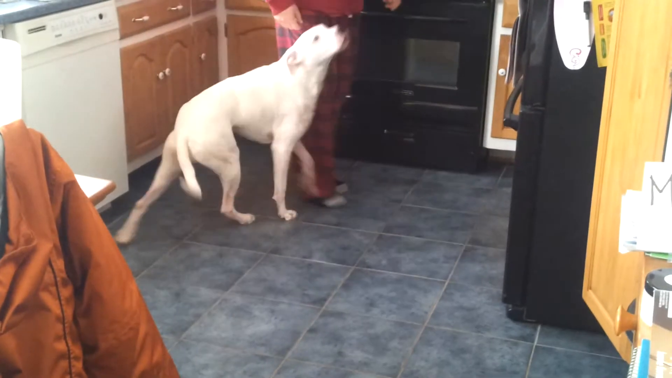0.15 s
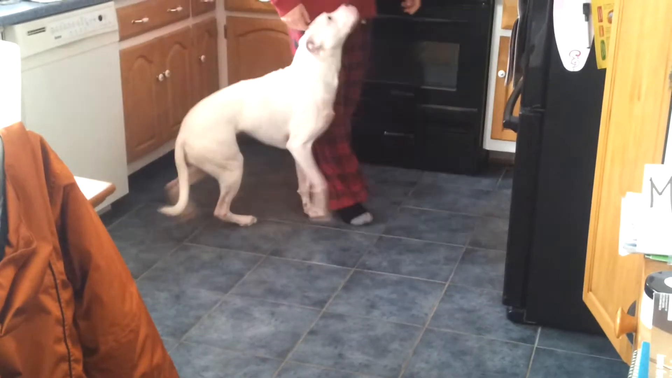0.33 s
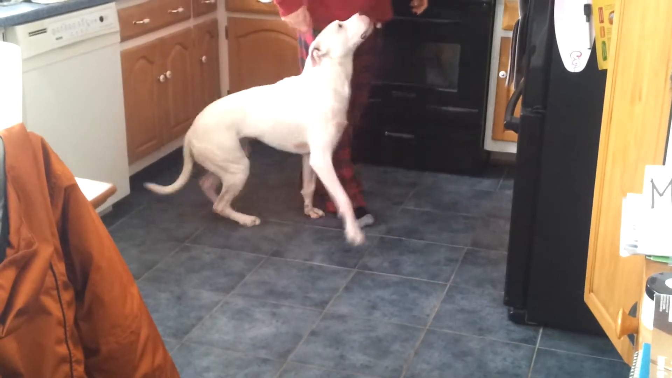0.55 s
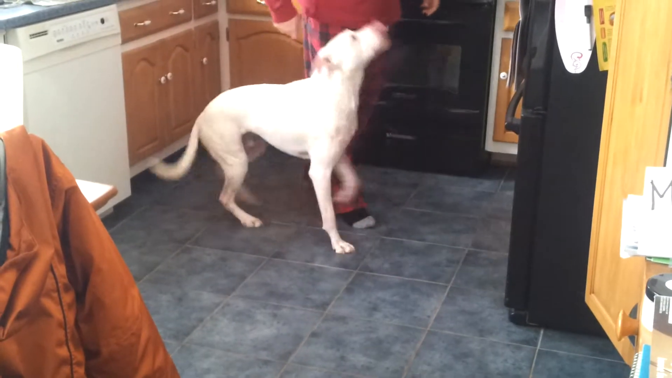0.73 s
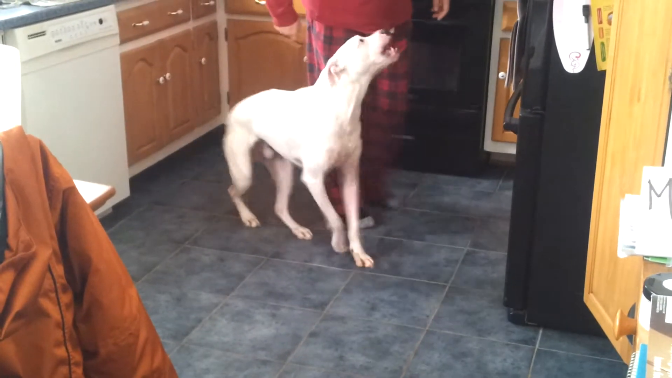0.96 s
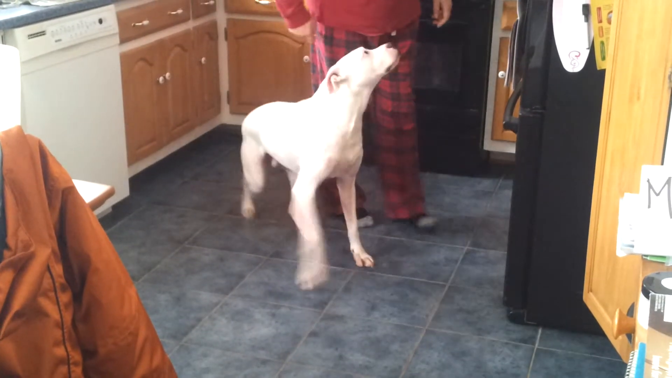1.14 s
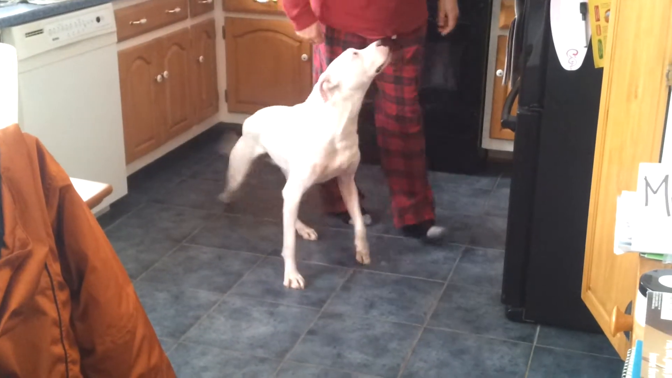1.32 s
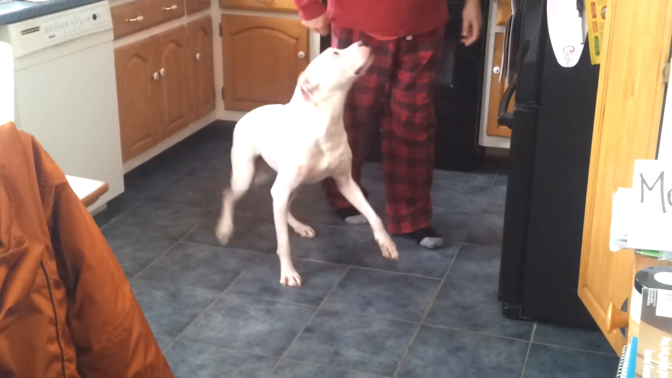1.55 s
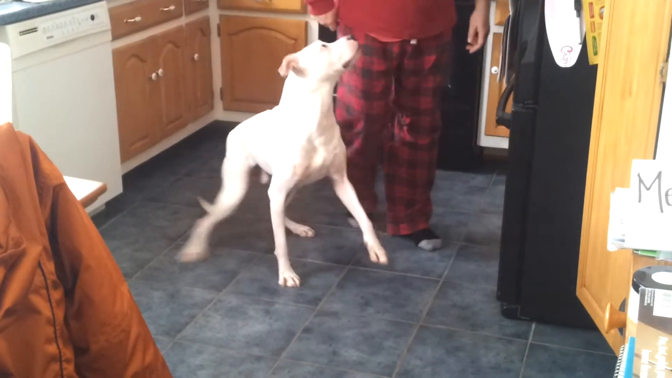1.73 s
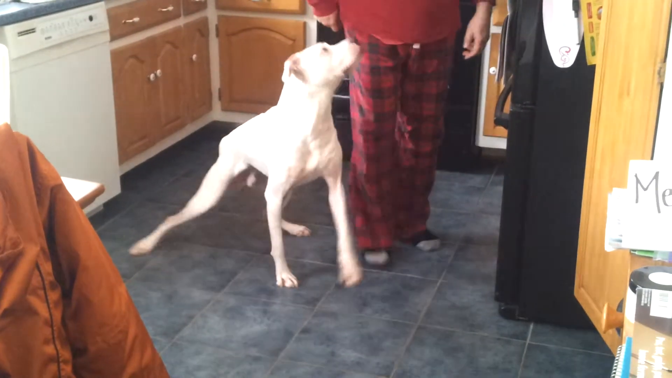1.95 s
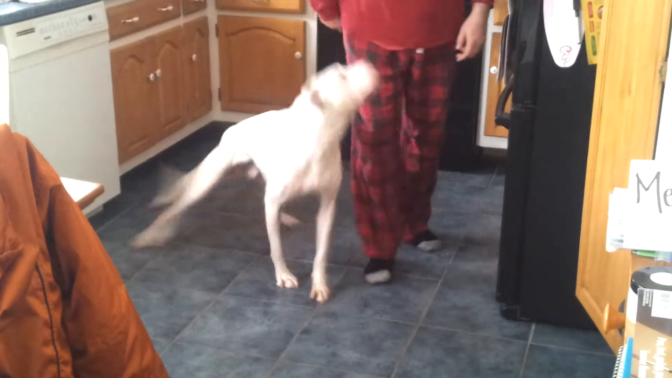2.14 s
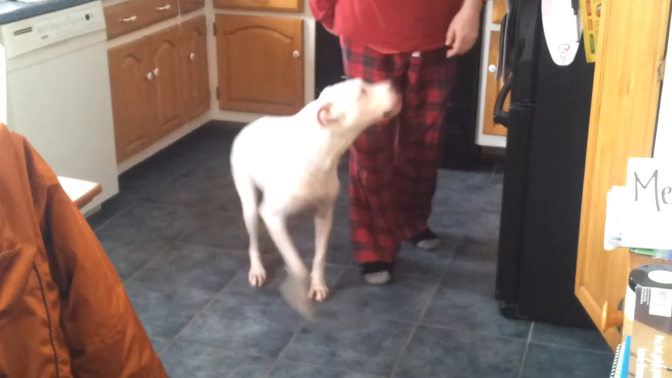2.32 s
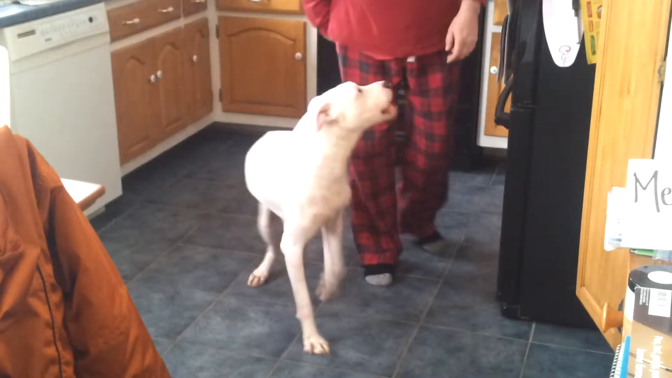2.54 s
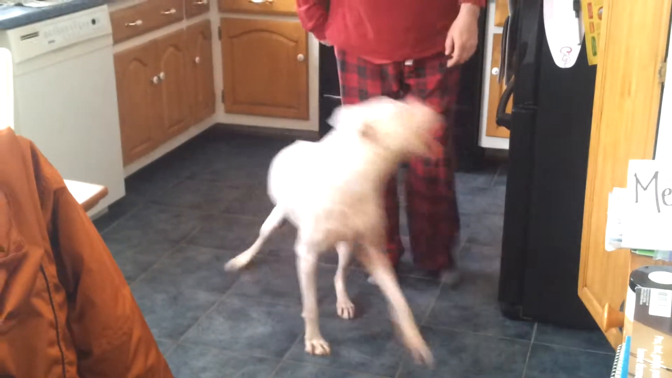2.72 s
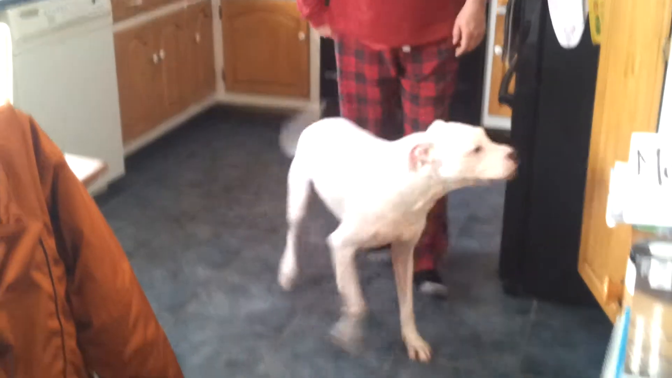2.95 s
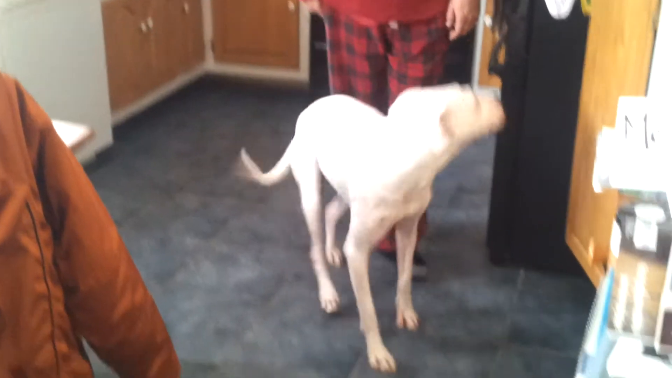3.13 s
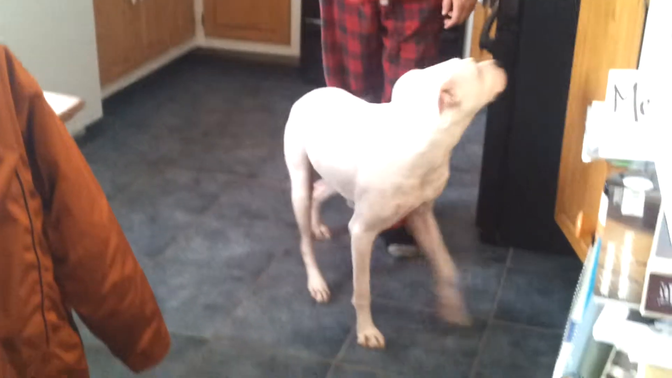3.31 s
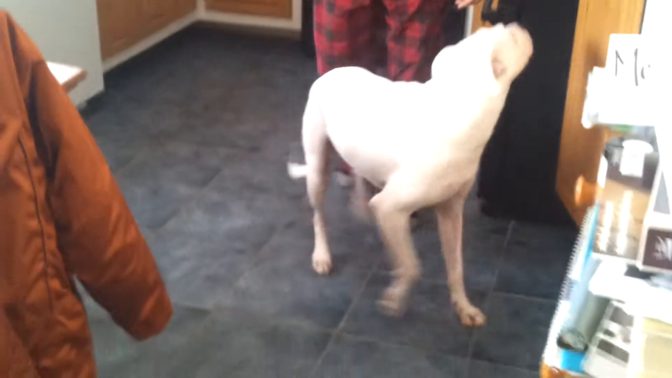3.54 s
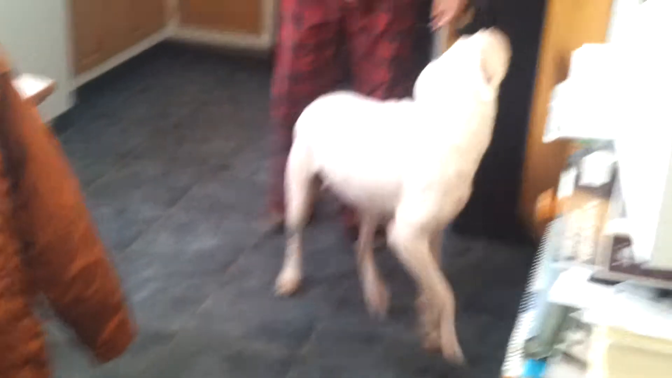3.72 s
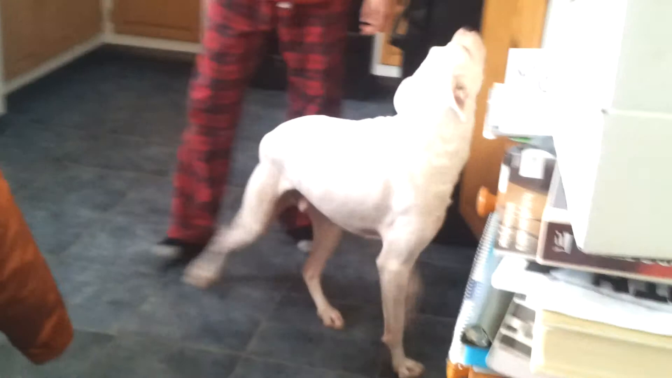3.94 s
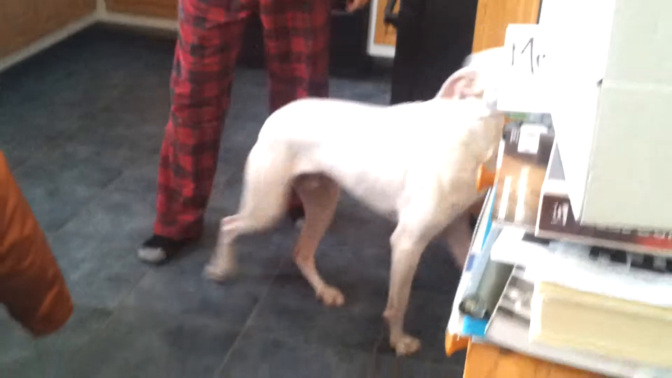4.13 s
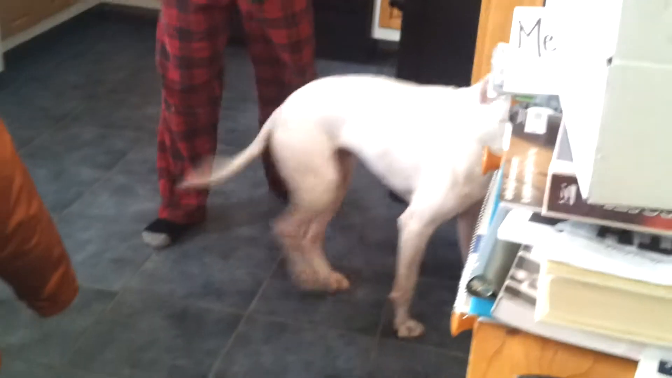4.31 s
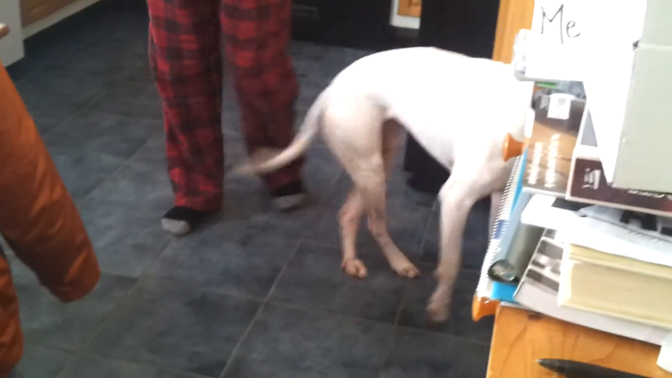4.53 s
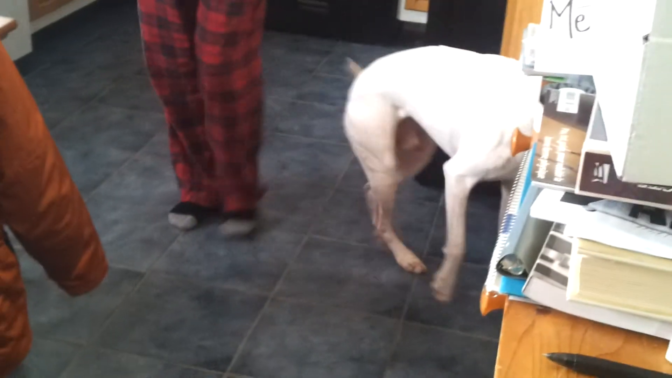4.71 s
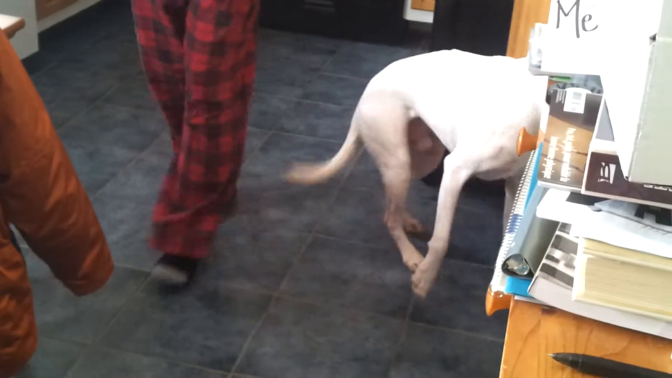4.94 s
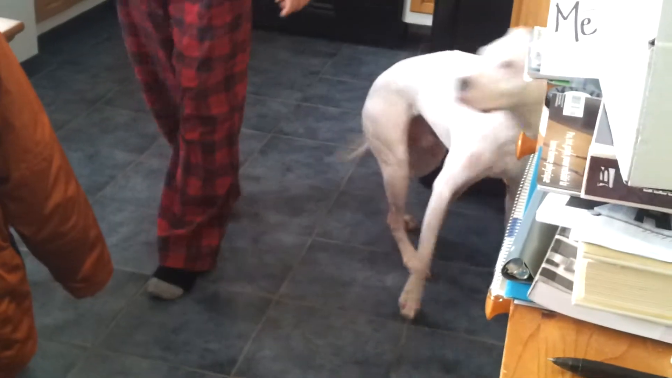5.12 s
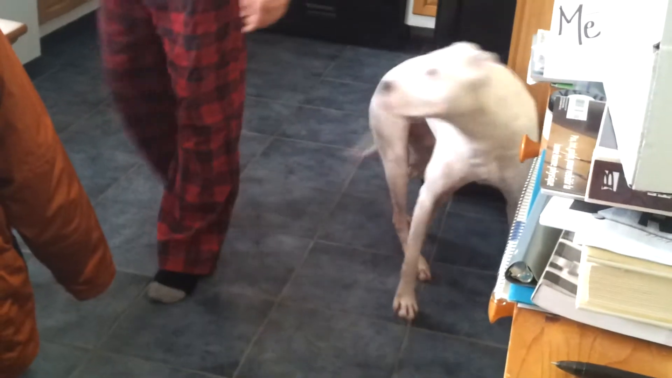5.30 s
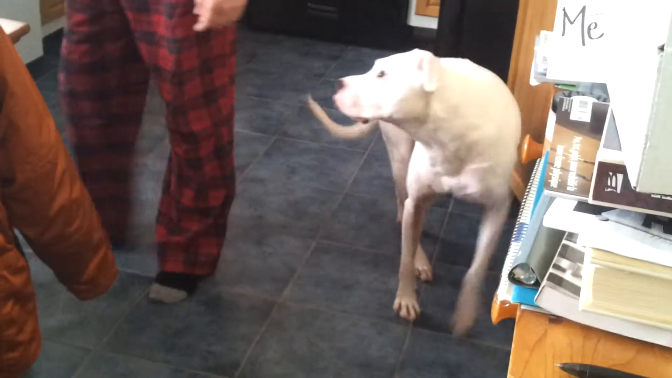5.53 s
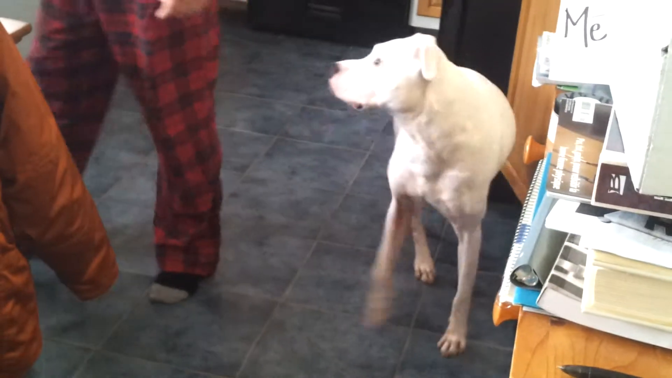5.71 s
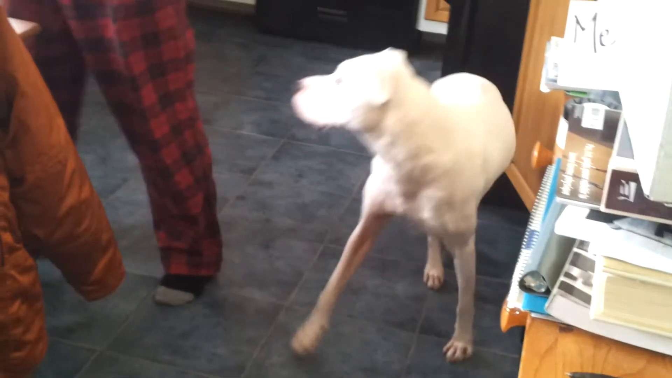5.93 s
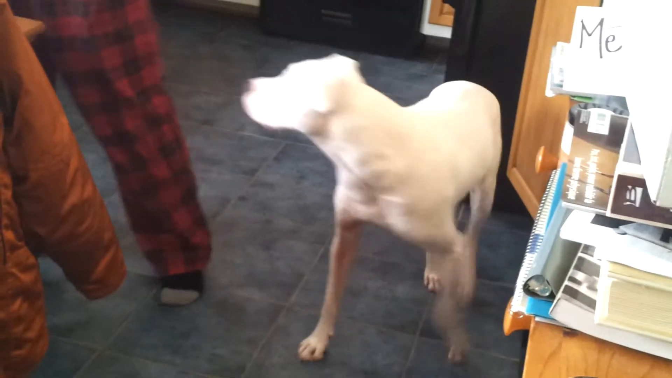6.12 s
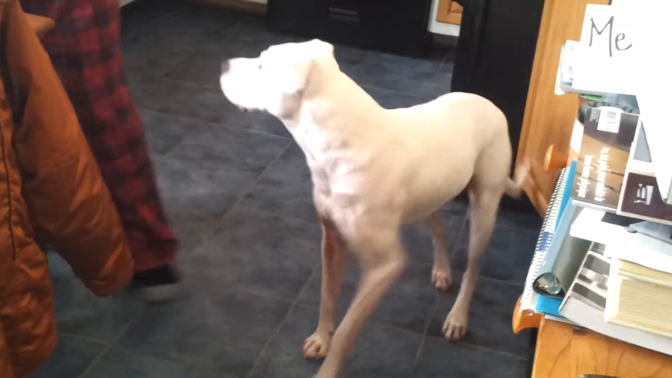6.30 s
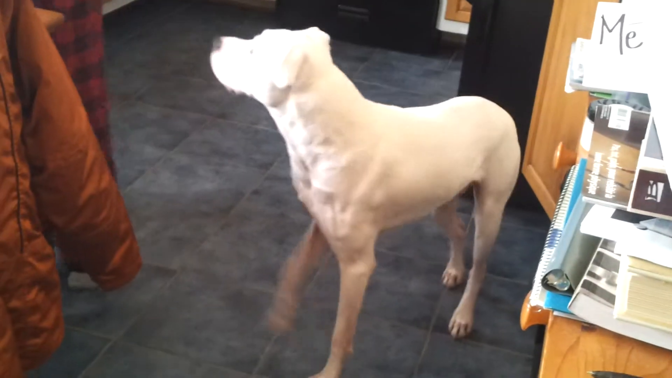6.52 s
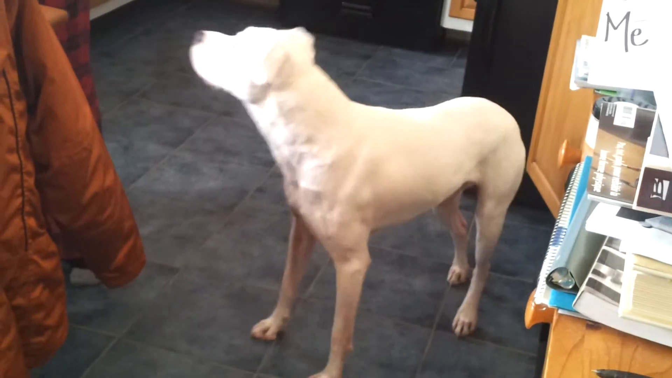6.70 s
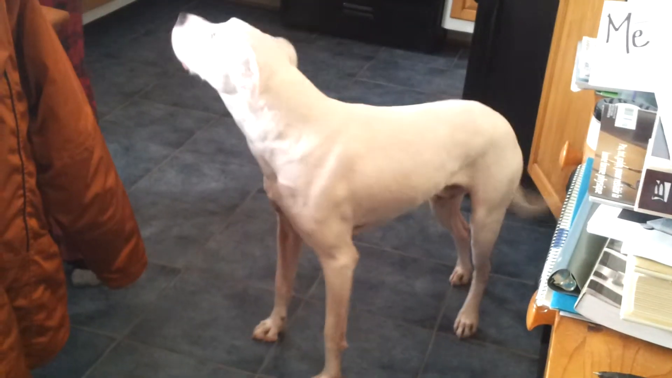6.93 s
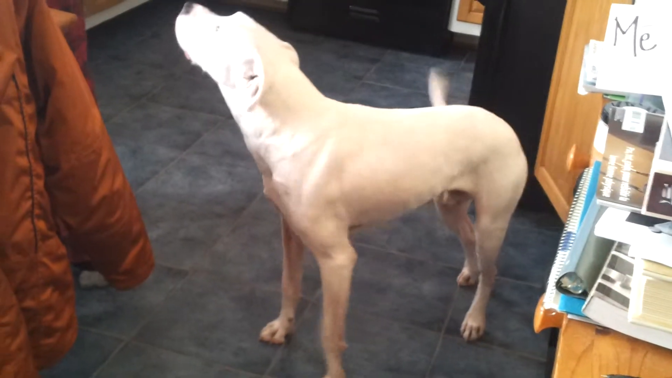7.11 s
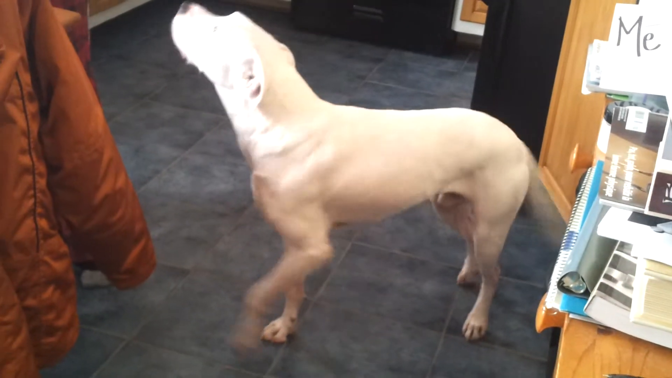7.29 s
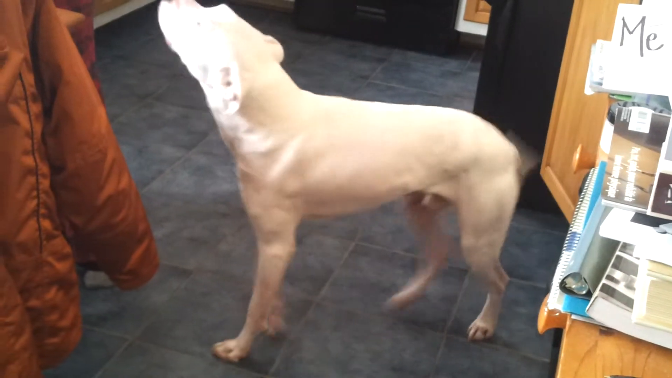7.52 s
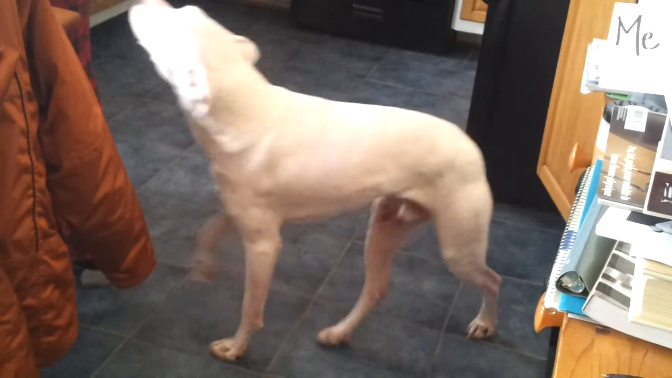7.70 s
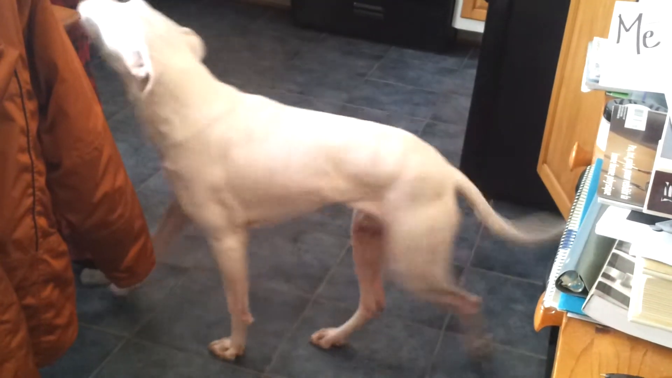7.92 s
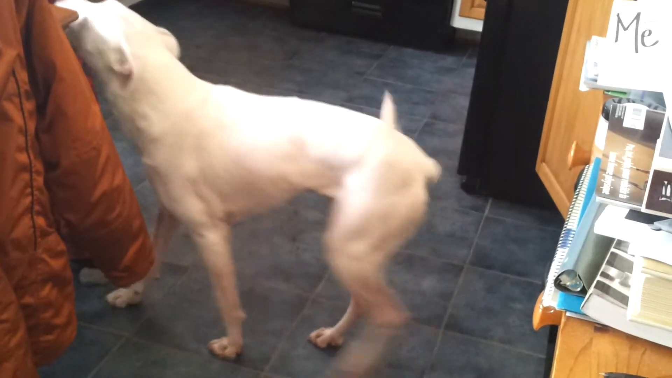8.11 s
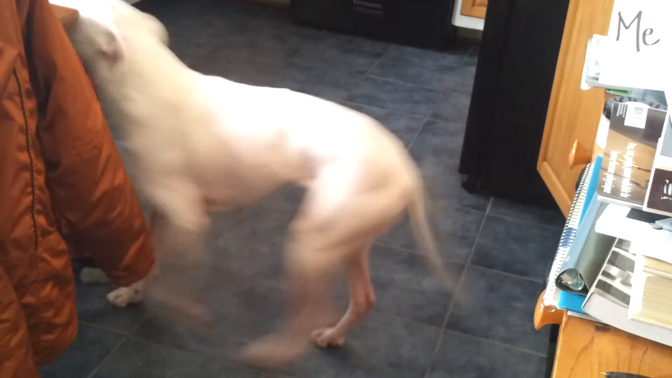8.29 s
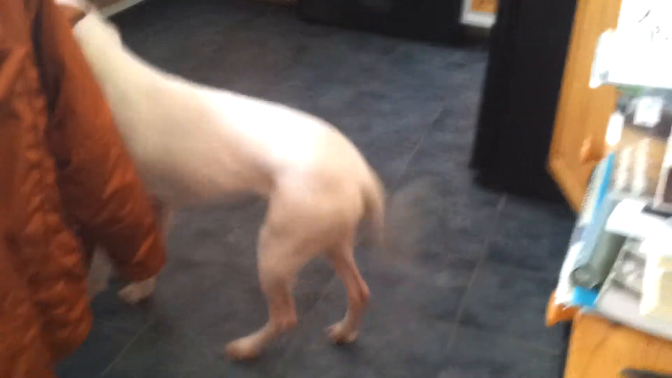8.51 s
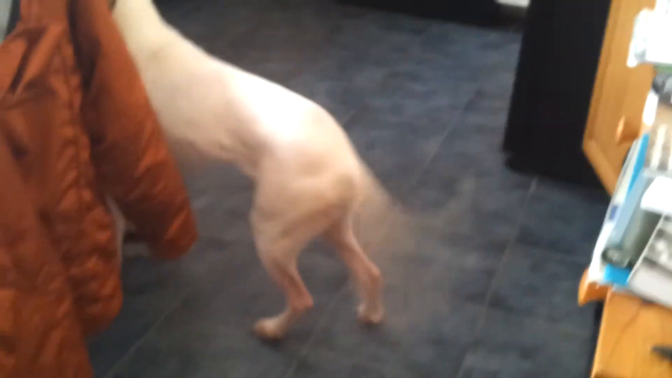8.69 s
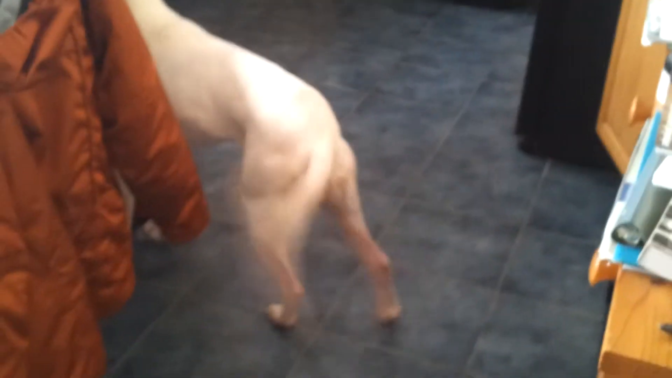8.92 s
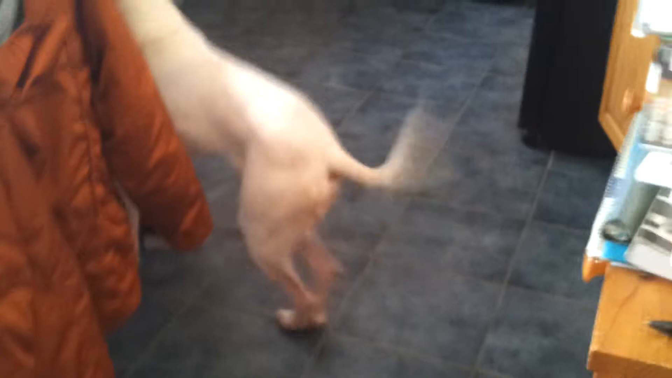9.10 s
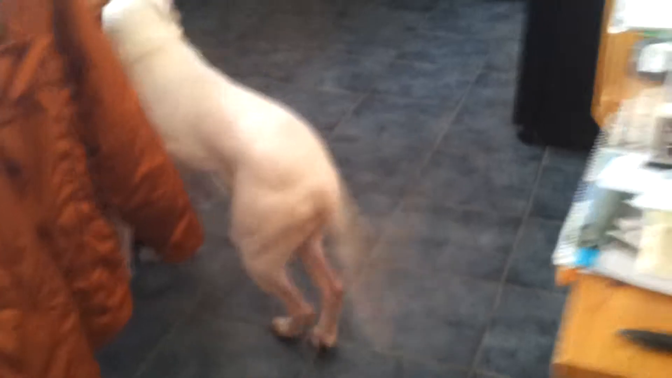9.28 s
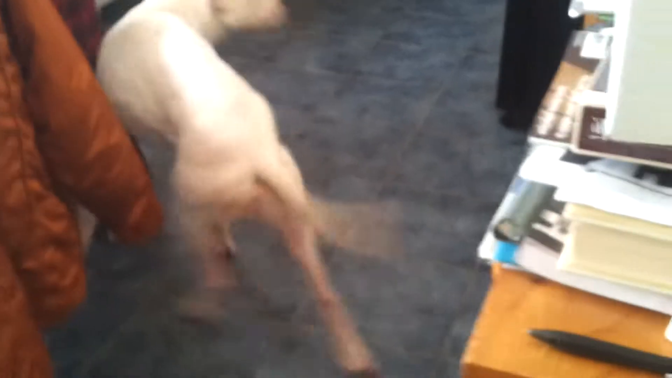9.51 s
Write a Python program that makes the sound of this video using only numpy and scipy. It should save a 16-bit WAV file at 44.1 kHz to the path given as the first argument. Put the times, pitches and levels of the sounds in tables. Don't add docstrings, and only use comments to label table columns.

```python
import sys
import numpy as np
from scipy import signal
from scipy.io import wavfile
from scipy.ndimage import uniform_filter1d

SR = 44100
rng = np.random.default_rng(int(sys.argv[2]) if len(sys.argv) > 2 else 0)


def how_loud(loudness_db):
    steps = np.asarray(loudness_db, float) / 20
    return 10 ** steps


def unload_wav(signal):
    wavfile.write(
        sys.argv[1],
        SR,
        np.round(np.clip(np.atleast_2d(signal).T, -1, 1) * 32767).astype(np.int16),
    )


N = 421134
SPOTS = 5

# freq_hz, density_db (dB per Hz)
HISS_SPECTRUM = [(24, -37), (40, -1.5), (160, -2.5), (191, -12), (216, -12), (251, -2), (329, -5),
                 (502, -11), (933, -11.5), (9360, -35), (13900, -28), (15000, -10.5)]
# start_s, level_db
RUSTLE_LEVEL = [(0.0, -37), (0.26, -47), (0.66, -44), (0.98, -50.5), (1.41, -39), (1.62, -53),
                (2.13, -42.5), (2.28, -39), (2.87, -46.5), (3.3, -45), (4.31, -49.5), (5.64, -52),
                (6.5, -49.5), (6.95, -54), (7.45, -55), (7.95, -41.5), (8.5, -59), (8.95, -48.5)]
# freq_hz, density_db (dB per Hz)
RUSTLE_SPECTRUM = [(88, -27), (150, -1.5), (265, -1.5), (366, -6), (685, -3), (2950, -7), (6810, -2),
                   (14000, -21.5)]
# start_s, treble_db, rasp_db (re treble), length_s
SLIDES = [(0.171, -37, 0.5, 0.075), (0.333, -25.5, -5.5, 0.045), (1.174, -33, -9, 0.15),
          (1.377, -34.5, 1, 0.16), (1.588, -27, -9.5, 0.027), (1.748, -35, -15.5, 0.15),
          (1.912, -44, -5.5, 0.12), (2.12, -27.5, -6, 0.086), (2.369, -26.5, -9, 0.077),
          (2.67, -32.5, -17, 0.052), (3.52, -56, 9.5, 0.1), (4.096, -36.5, -5, 0.12),
          (4.21, -38.5, -10, 0.063), (4.538, -41, -19, 0.067), (4.755, -45, -13, 0.066),
          (5.97, -56, 5, 0.039), (7.58, -43, -19, 0.061), (7.896, -41, -1.5, 0.15),
          (8.06, -31, -1.5, 0.026), (8.825, -55.5, -0.5, 0.047)]
# start_s, treble_db, rasp_db (re treble)
SCUFFS = [(0.042, -33, -3.5), (0.6, -42.5, 0), (1.01, -37, -12), (1.32, -28.5, -12), (2.293, -26.5, -39),
          (2.928, -33.5, -9.5), (3.808, -42, -20), (3.91, -34.5, -14), (3.997, -28, -12), (4.29, -45, -29),
          (5.452, -50, -21), (6.152, -43.5, -20), (6.514, -46.5, -2), (7.214, -50, -16),
          (7.442, -39.5, -27), (7.88, -31, -2), (8.224, -45, -26), (8.595, -40, -13), (8.9, -36.5, -12),
          (9.42, -36.5, -11), (9.545, -27, -18)]
RASP_RESONANCES = [1750, 2510, 3040, 3890]
# start_s, level_db
HAND_SHIFTS = [(0.1, -55), (0.35, -51), (0.66, -55), (1.0, -52), (1.33, -41), (1.55, -54), (2.15, -49),
               (2.5, -47), (2.9, -55), (3.22, -41), (3.59, -55), (3.96, -56), (4.23, -45), (4.71, -53),
               (5.07, -36.5), (5.69, -48), (5.93, -51), (6.15, -59), (6.46, -46), (6.8, -52), (6.9, -52),
               (7.26, -61), (7.5, -53), (7.61, -58), (7.95, -58), (8.27, -48.5), (8.6, -53), (8.83, -57),
               (9.09, -47), (9.47, -56)]
# start_s, level_db (peak), body_db (horny body re peak), ring_db
LANDINGS = [(0.2662, -13, -13, -33), (0.632, -11.5, -21, -45), (0.9849, -20, -23, -36),
            (1.1905, -8, -20, -42), (1.279, -6.5, -15, -32), (1.3127, -10.5, -5, -25),
            (1.3198, -6, -24, -35), (1.4466, -15, -13, -32), (2.1035, -12, -12, -36),
            (2.9209, -16, -27, -40), (3.1437, -7.5, -38, -15.5), (3.8612, -14, -15.5, -54),
            (5.1886, -17, -12.5, -70), (5.6127, -10.5, -27, -35), (5.6155, -10.5, -13.5, -47),
            (6.3646, -12, -48, -28), (6.3839, -11, -46, -46), (6.514, -18.5, -19, -45),
            (6.6668, -12, -10.5, -43), (6.6742, -11.5, -48, -43), (7.4424, -12.5, -43, -45),
            (7.856, -16, -14, -45), (8.4462, -16, -18, -50), (9.0407, -18.5, -17, -26),
            (9.0583, -6, -32, -17), (9.3705, -13.5, -13, -45)]
# start_s, level_db (peak), body_db (re peak)
MORE_TICKS = [(0.6876, -16.5, -13.5), (1.0071, -16, -17), (1.0657, -29, -6), (2.6437, -34, -27),
              (2.84, -24, -5), (2.8807, -17, -10), (3.2665, -25, -4), (3.492, -29.5, -11),
              (3.5359, -20.5, -2.5), (3.987, -19, -10), (4.4768, -32, -107), (4.7414, -27.5, -16),
              (4.7636, -23.5, -18), (5.4301, -53, -34), (5.972, -33, -4), (6.05, -24, -25), (6.149, -27.5, -12),
              (7.197, -35.5, -5), (7.2037, -31.5, -1.5), (7.436, -13.5, -21), (7.569, -23.5, -4.5),
              (7.8369, -16, -19), (8.2137, -27, -16), (8.4398, -17, -17), (9.5389, -14, -12)]
# start_s, level_db (peak), pitch_hz
THUDS = [(0.274, -50.5, 79), (0.631, -45.5, 76), (0.99, -46.5, 77), (1.209, -48, 91), (1.307, -31.5, 81),
         (1.621, -51.5, 89), (1.86, -51.5, 76.6), (2.278, -38.5, 78.5), (2.838, -47, 87.5),
         (4.695, -48, 55.6), (5.627, -52.5, 104), (6.796, -48, 65), (7.319, -43.5, 108.4)]
# start_s, level_db (peak), pitch_hz (floor resonance)
PAD_STEPS = [(0.333, -51, 244), (0.631, -42, 242), (0.872, -48.5, 267), (0.986, -50, 285),
             (1.197, -37.5, 173), (1.311, -24.5, 321), (2.118, -46, 159), (2.298, -59, 195),
             (2.465, -42, 174.7), (2.7, -50, 300), (2.76, -45, 200), (2.859, -69, 286), (3.134, -39, 159),
             (3.438, -37, 155), (3.866, -45.5, 181), (4.199, -47, 327), (4.691, -49, 167), (5.04, -51, 300),
             (5.631, -40.5, 193), (6.019, -45, 166), (6.384, -50.5, 330), (6.678, -44.5, 166),
             (7.198, -51.5, 304), (7.331, -30.5, 273.5), (7.884, -51, 400), (8.089, -56, 154),
             (8.444, -35, 169), (8.899, -63, 148), (9.036, -45, 132), (9.374, -49, 161)]
# start_s, level_db (peak), pitch_hz
POPS = [(0.874, -33, 780), (1.056, -25, 588), (2.258, -47, 1570), (2.622, -30.5, 1014), (2.779, -35, 720),
        (2.8, -31.5, 1106), (2.978, -31.5, 638), (3.601, -28.5, 1205), (4.607, -36.5, 930),
        (6.017, -43, 775), (8.087, -32, 1200)]
# start_s, level_db (peak)
KNOCKS = [
    (1.309, -26),
    (7.327, -16),
]
# freq_hz, width_hz, gain_db
PANEL_MODES = [(300, 440, -5.5), (397, 49, 3), (710, 140, 1), (1174, 610, 3), (1485, 670, 2.5),
               (2140, 230, -9.5)]
# freq_hz, t60_s
ROOM_T60 = [(100, 0.3), (300, 0.38), (1000, 0.53), (3000, 0.41), (7000, 0.45), (14000, 0.32)]
# freq_hz, level_db
TAIL_SPECTRUM = [(60, -7.5), (250, 2.5), (800, 1.5), (3000, 0.5), (14000, -3)]
# freq_hz, correlation (0 to 1)
PORT_LIKENESS = [(50, .9), (130, .8), (300, .85), (600, .7), (1200, .1), (14000, .02)]
# freq_hz, left_minus_right_db
PORT_BALANCE = [(60, 11), (240, 2.5), (940, 1.0), (3710, 1.5), (14700, -3.5)]
# freq_hz, width_hz, gain_db
PORT_RESONANCE = (6880, 1300, 13.38)
# start_s, left_minus_right_db
DOG_SIDE = [
    (0, -0.8),
    (2.2, -0.5),
    (4.5, -1.5),
    (5.298, -1.5),
    (5.61, -1),
    (6.0, -1),
    (7.8, -1.5),
    (9.55, 0),
]


def rms_one(x):
    return x / np.sqrt(np.mean(x ** 2) + 1e-20)


def at_hz(points, hz):
    freq_hz, value = np.array(points).T[:2]
    return np.interp(np.log(hz), np.log(freq_hz), value)


def in_time(rows):
    return how_loud(np.interp(np.arange(N) / SR, *np.transpose(rows)))


def butter(x, hz, kind, order=2):
    return signal.sosfilt(signal.butter(order, hz, kind, fs=SR, output="sos"), x)


def resonance(x, hz, width_hz):
    r = np.exp(-np.pi * width_hz / SR)
    numerator = (1 - r * r) / 2 * np.array([1, 0, -1])
    return signal.lfilter(numerator, [1, -2 * r * np.cos(2 * np.pi * hz / SR), r * r], x)


def drift(rate_hz):
    r = np.exp(-2 * np.pi * rate_hz / SR)
    slow = signal.lfilter([1], [1, -2 * r, r * r], rng.standard_normal(N + SR))
    return rms_one(slow[SR:])


def swells(rows, rise_db_per_s, fall_db_per_s):
    t = np.arange(0, N + 64, 32) / SR
    start, db, length = np.transpose(rows)[:, :, None]
    before, after = np.maximum(start - t, 0), np.maximum(t - start - length, 0)
    gain = how_loud(db - rise_db_per_s * before - fall_db_per_s * after)
    return np.interp(np.arange(N) / SR, t, gain.sum(axis=0))


def place(rows, shape_of, to_peak=True):
    out = np.zeros((SPOTS, N + SR))
    for k, row in enumerate(rows):
        shape, at = shape_of(row), round(row[0] * SR)
        if to_peak:
            shape = shape / np.max(np.abs(shape))
        out[k % SPOTS, at:at + len(shape)] += how_loud(row[1]) * shape
    return out[:, :N]


def stereo_bands(size, count, gain_of_band):
    out, edges = 0, 35 * 2 ** np.arange(0, 9.1, .5)
    white = rng.standard_normal((2, 2, count, size))
    for k, (low, high) in enumerate(zip(edges, edges[1:])):
        mid, side = butter(white[k % 2], [low, high], "band")
        hz = np.sqrt(low * high)
        alike = np.clip(at_hz(PORT_LIKENESS, hz), 0, .98)
        lean = how_loud(at_hz(PORT_BALANCE, hz) / 2)
        mid, side = np.sqrt(1 + alike) * mid, np.sqrt(1 - alike) * side
        out = out + gain_of_band(hz) * np.array([(mid + side) * lean, (mid - side) / lean])
    return out


def hiss():
    noise = stereo_bands(N, 1, lambda hz: how_loud(at_hz(HISS_SPECTRUM, hz)))[:, 0]
    return how_loud(-54.5) * rms_one(noise)


def rustle():
    noise = stereo_bands(N, 1, lambda hz: how_loud(at_hz(RUSTLE_SPECTRUM, hz)))[:, 0]
    return in_time(RUSTLE_LEVEL) * rms_one(noise * how_loud(2.0 * drift(16)))


def grit(per_s):
    caught = rng.random(N) < per_s * how_loud(3.0 * drift(40)) / SR
    size_db = 3.0 * np.minimum(rng.exponential(1, N), 4)
    return caught * how_loud(size_db) * rng.choice([-1, 1], N)


def friction_gain(rasp_share):
    slides = [(s - 0.01, db + rasp_share * rasp_db, length) for s, db, rasp_db, length in SLIDES]
    scuffs = [(s - 0.01, db + rasp_share * rasp_db, 0) for s, db, rasp_db in SCUFFS]
    return swells(slides, 312, 286) + swells(scuffs, 344, 286)


def skids():
    nails = butter(butter(grit(6000), 2200, "high"), 22000, "low", order=1)
    catches, rasp = grit(4000), 0
    for k, hz in enumerate(RASP_RESONANCES):
        rasp = rasp + how_loud(1.3 * drift(15)) * resonance(catches, hz, .8 * hz) * (-1) ** k
    rasp = butter(rasp, 1230, "high")
    drag = how_loud(-8.5) * friction_gain(0) * rms_one(nails) + how_loud(-5.5) * friction_gain(1) * rms_one(rasp)
    t = np.arange(N) / SR
    sweep = np.cos(np.pi * (6.0 * t - np.arange(SPOTS)[:, None] / SPOTS)) ** 2
    return drag * sweep / np.sqrt(np.sum(sweep ** 2, axis=0))


def handling_rumble():
    shake = rng.standard_normal(N) + 0.46 * rng.standard_normal((2, N))
    shake = butter(butter(shake, [16, 42], "band"), 50, "low")
    return swells([(s, db, 0) for s, db in HAND_SHIFTS], 162, 84) * rms_one(shake)


def claw(row):
    tick = np.zeros(300)
    tick[0] = 1
    tick[rng.integers(20, 200, size=3)] = 0.76 * rng.uniform(-1, 1, size=3)
    tick = butter(tick, 15050, "low", order=1)
    body = butter(resonance(tick, 1970, 3800), 890, "high")
    return butter(tick, 4900, "high", order=1) + how_loud(row[2] + 8) * body


def nail_ping(row):
    level_db, ring_db = row[1], row[3]
    tick = np.zeros(300)
    tick[int(.0012 * SR)] = 1
    return 1.8 * resonance(resonance(tick, 2800, 1300), 2950, 1300) * how_loud(ring_db - level_db)


def pad(row):
    pitch_hz = row[2]
    t = np.arange(6000) / SR
    wobble = np.cumsum(rng.standard_normal(len(t))) * .04 * pitch_hz / 250
    puff = rms_one(butter(rng.standard_normal(len(t)), [0.8 * pitch_hz, 2.0 * pitch_hz], "band"))
    push = np.sin(2 * np.pi * pitch_hz * t + wobble) + 0.4 * puff
    return push * (1 - np.exp(-t / 0.0019)) * np.exp(-t / 0.025)


def pop(row):
    t = np.arange(4000) / SR
    wobble = np.cumsum(rng.standard_normal(len(t))) * 0.07
    return np.sin(2 * np.pi * row[2] * t + wobble) * (1 - np.exp(-t / 0.0012)) * np.exp(-t / 0.004)


def knock(row):
    blow = np.zeros(4000)
    blow[[0, int(.016 * SR)]] = 1, .6
    panel = 0
    for k, (hz, width_hz, db) in enumerate(PANEL_MODES):
        panel = panel + how_loud(db) * resonance(blow, hz, width_hz) * (-1) ** k
    return butter(panel, 1600, "low", order=1)


def kitchen():
    t = np.arange(int(.7 * SR)) / SR

    def decay(hz):
        return how_loud(at_hz(TAIL_SPECTRUM, hz) - 60 * t / max(at_hz(ROOM_T60, hz), .1))

    tails = stereo_bands(len(t), SPOTS, decay)
    lumps = uniform_filter1d(rng.standard_normal((SPOTS, len(t))), size=30) * np.sqrt(30)
    tails = tails * how_loud(1.1 * lumps * np.exp(-t / 0.038))
    tails = tails * (1 - np.exp(-t / 0.006)) * (1 + 0.3 * np.exp(-t / 0.012))
    tails = how_loud(4.5) * tails / np.sqrt(np.sum(tails ** 2, axis=-1, keepdims=True))
    delay_s = np.array([.0013, .0030, .0070]) + rng.uniform(-.0002, .0002, (2, SPOTS, 3))
    port, spot, echo = np.indices(delay_s.shape)
    echo_gain = how_loud(np.array([1.0, -9.0, -4.0]))[echo] * (-1) ** echo
    tails[port, spot, (delay_s * SR).astype(int)] += echo_gain
    return tails


def microphone_ports(heard):
    hz, width_hz, gain_db = PORT_RESONANCE
    heard = heard + (how_loud(gain_db) - 1) * resonance(heard, hz, width_hz)
    return butter(heard, 8400, "low", order=1)


def scene():
    claws = sorted(LANDINGS + [(*row, row[1] - 31) for row in MORE_TICKS])
    ticks = how_loud(1.5) * place(claws, claw)
    paws = how_loud(-0.5) * place(PAD_STEPS, pad) + how_loud(6.5) * place(THUDS, pad)
    spots = skids() + ticks + paws + how_loud(-10.0) * place(POPS, pop) + how_loud(1.5) * place(KNOCKS, knock)
    near = spots + how_loud(31.0) * place(claws, nail_ping, to_peak=False)
    lags = [0, 6, -3, 3, -6]
    second_port = sum(np.roll(v, lag) for v, lag in zip(near, lags))
    direct = np.array([near.sum(axis=0), second_port])
    wet = signal.fftconvolve(spots[None], kitchen(), axes=-1)[..., :N].sum(axis=1)
    pan_db = np.interp(np.arange(N) / SR, *np.transpose(DOG_SIDE))
    heard = (how_loud(-7.5) * direct + wet) * how_loud(np.array([pan_db, -pan_db]) / 2)
    return microphone_ports(heard) + hiss() + rustle() + handling_rumble()


def band_limit(x):
    return signal.sosfilt(signal.butter(12, 15260, fs=SR, output="sos"), x)


def record(dry):
    rounded = .8 * np.tanh(dry / .8)
    mix = signal.sosfilt(signal.cheby2(4, 30, 15900, fs=SR, output="sos"), rounded)
    return band_limit(mix)


dry = scene()
out = record(dry)
unload_wav(out)
```